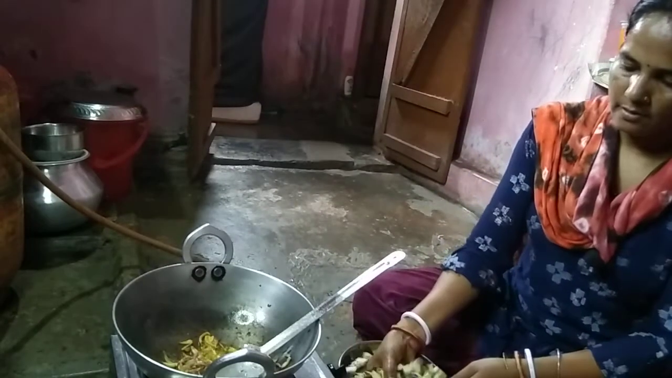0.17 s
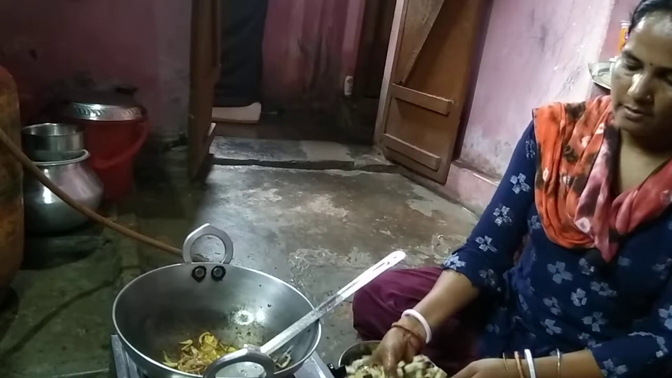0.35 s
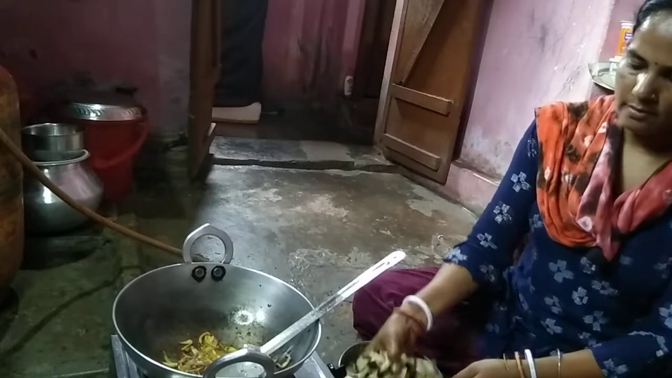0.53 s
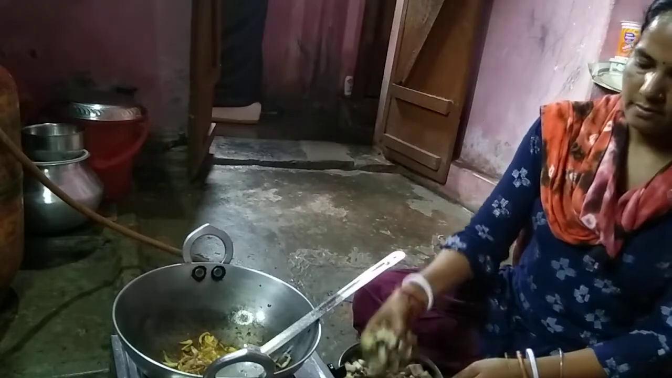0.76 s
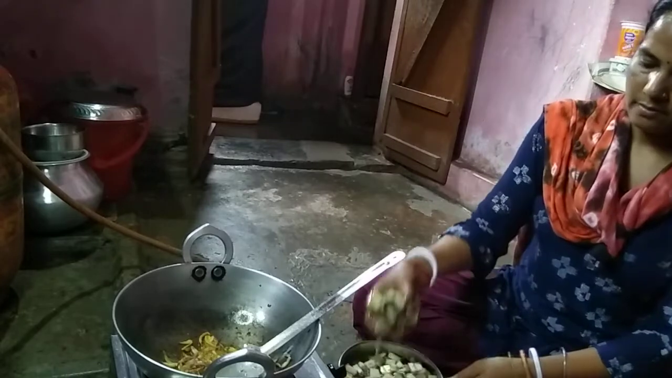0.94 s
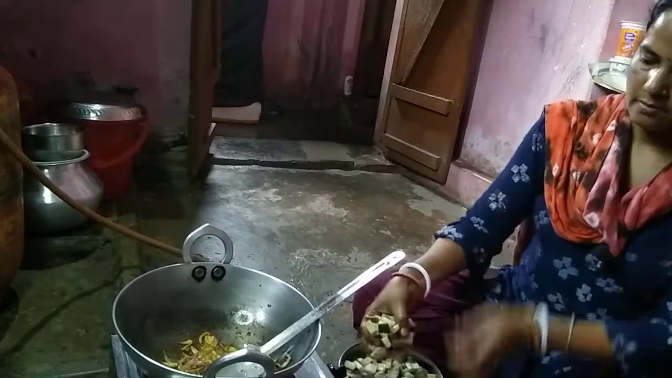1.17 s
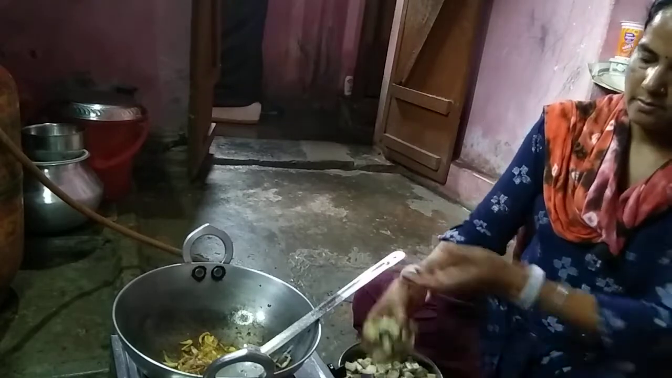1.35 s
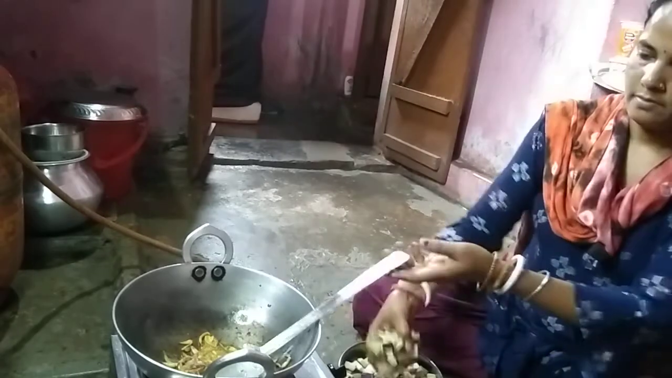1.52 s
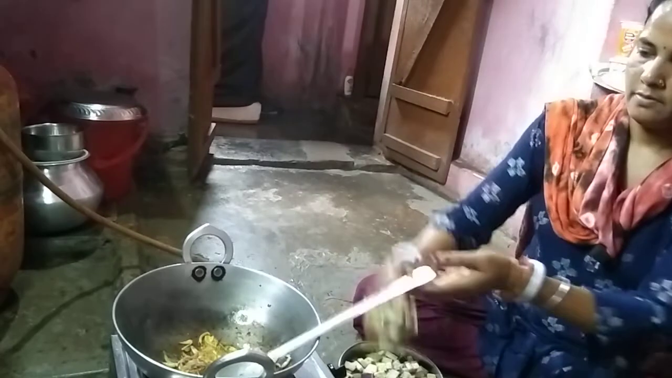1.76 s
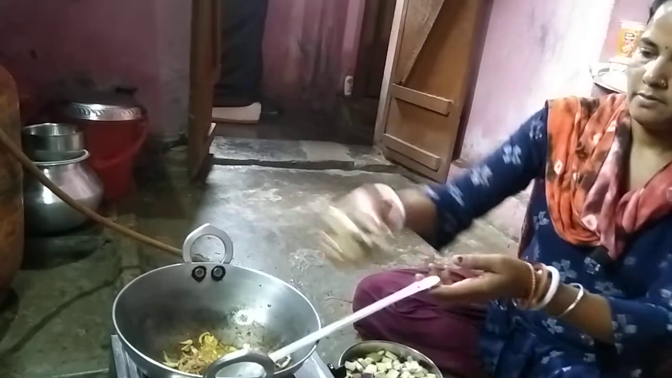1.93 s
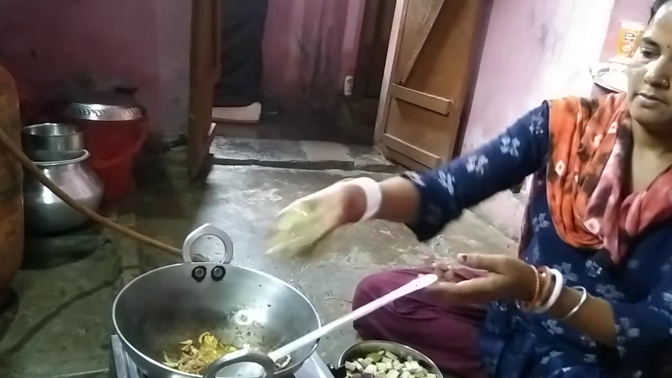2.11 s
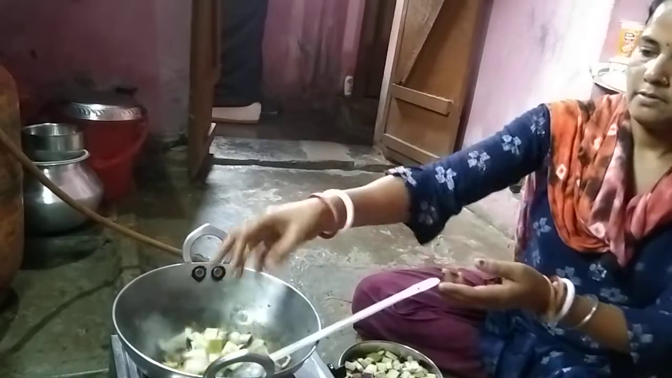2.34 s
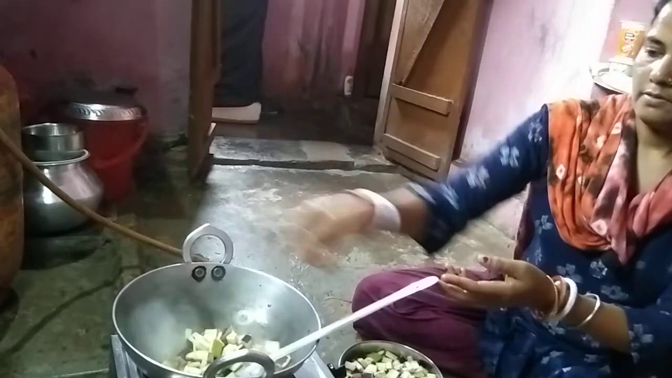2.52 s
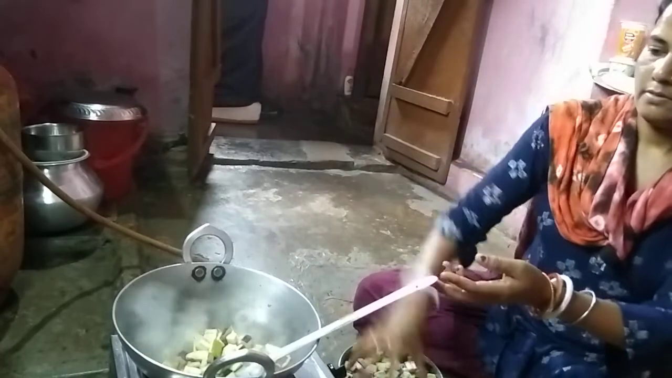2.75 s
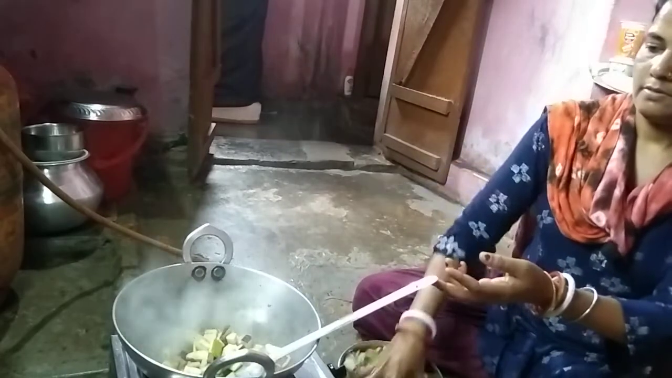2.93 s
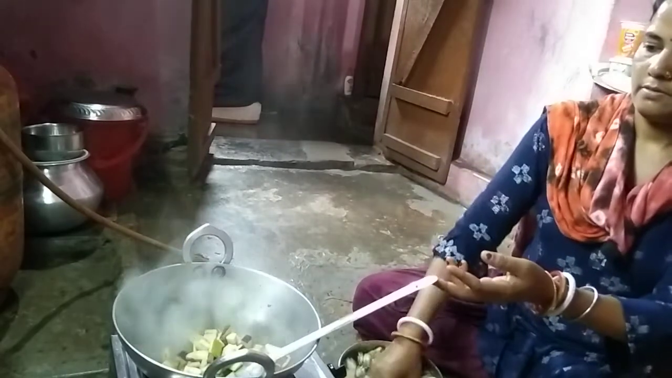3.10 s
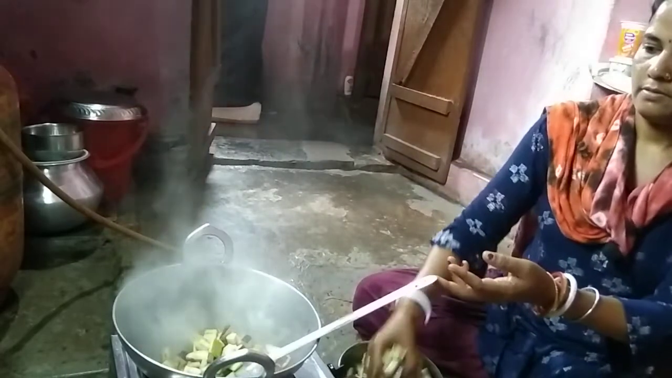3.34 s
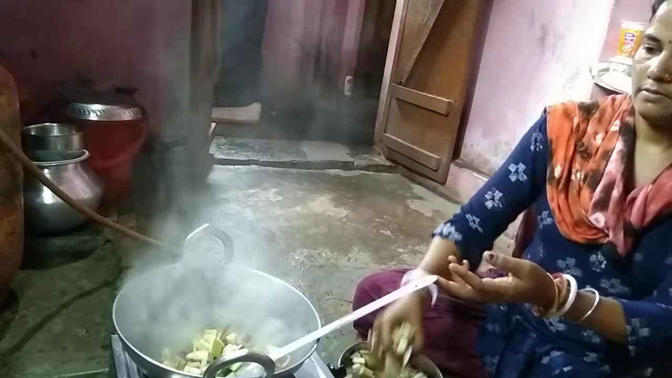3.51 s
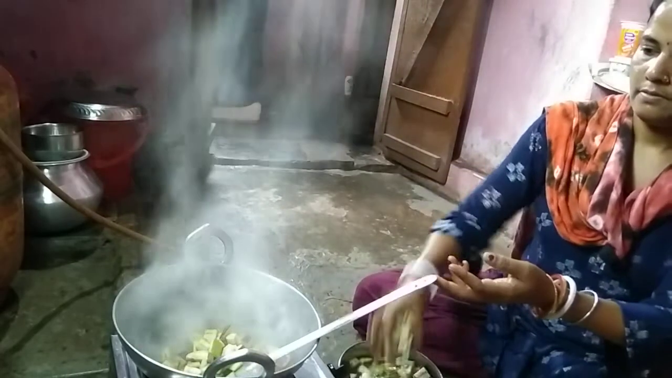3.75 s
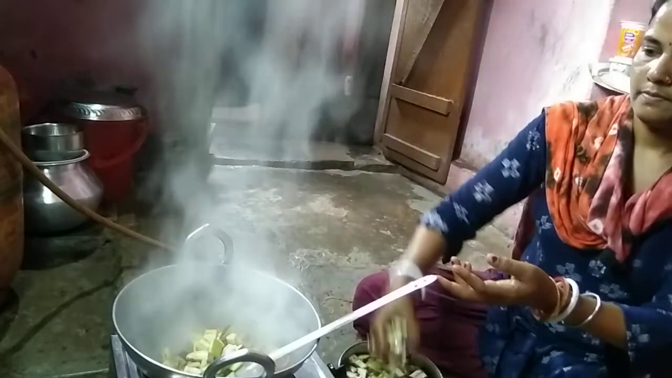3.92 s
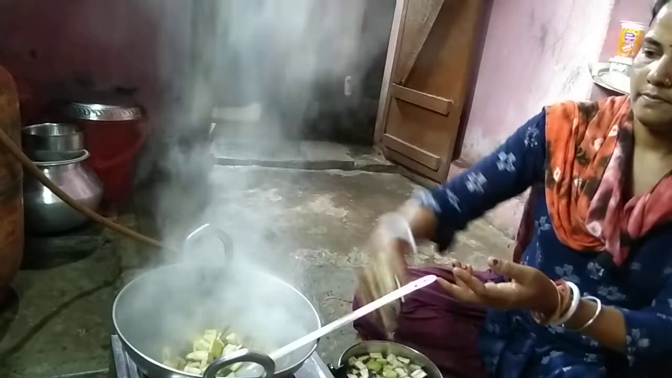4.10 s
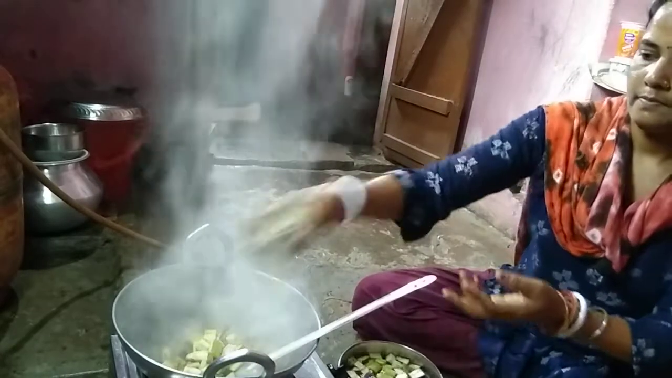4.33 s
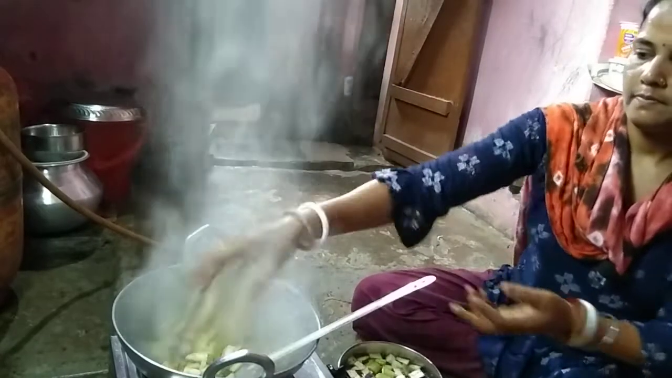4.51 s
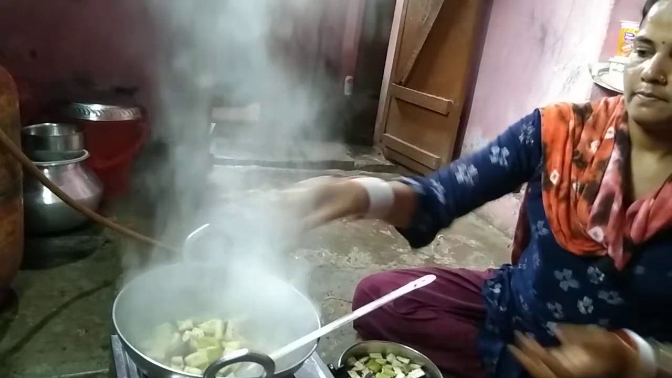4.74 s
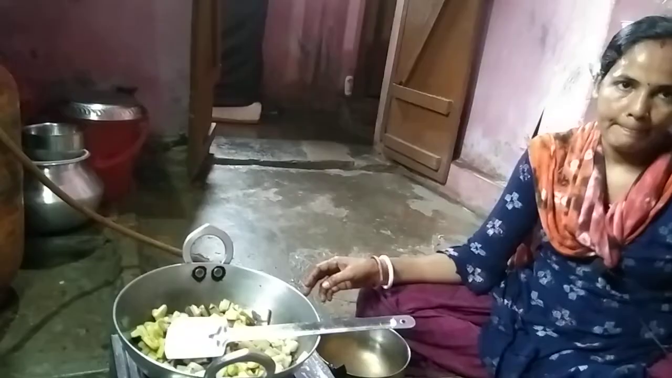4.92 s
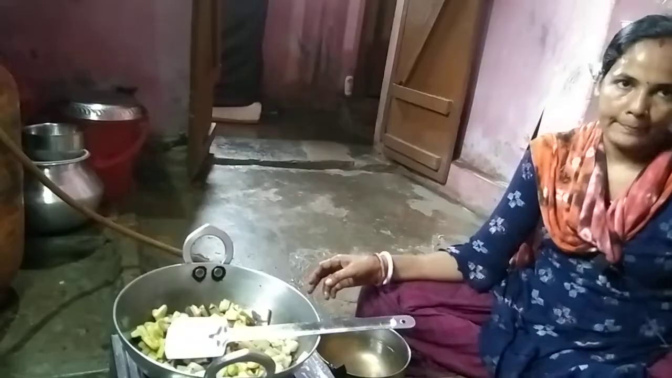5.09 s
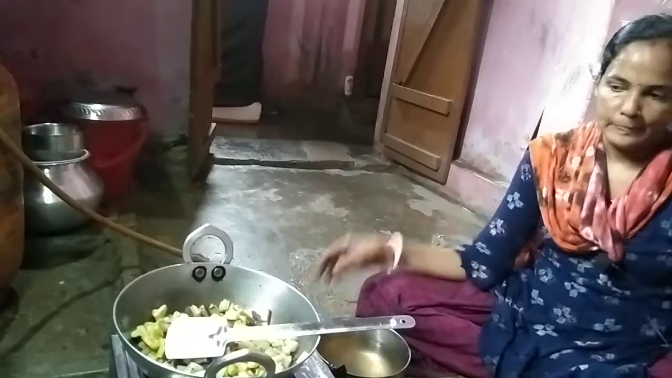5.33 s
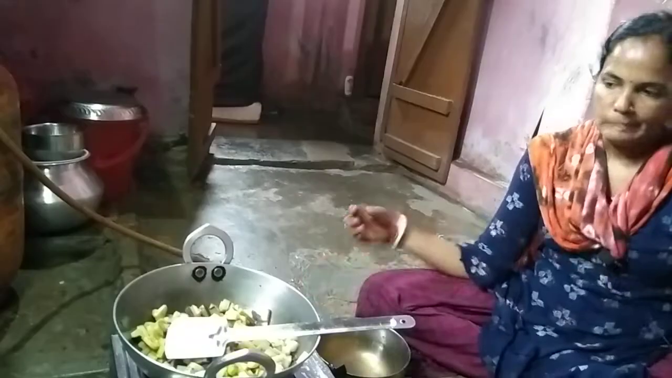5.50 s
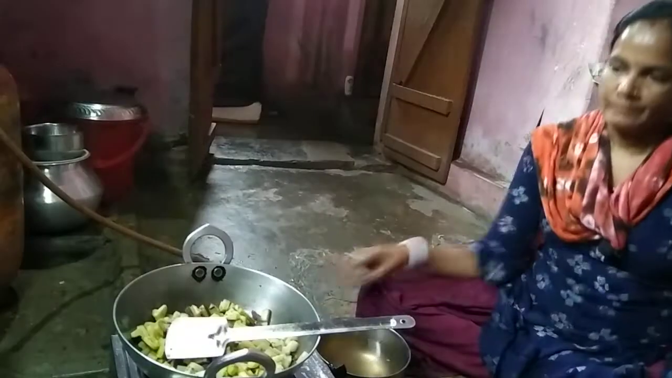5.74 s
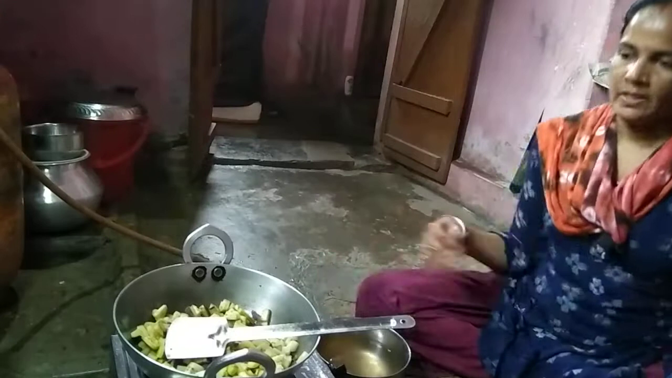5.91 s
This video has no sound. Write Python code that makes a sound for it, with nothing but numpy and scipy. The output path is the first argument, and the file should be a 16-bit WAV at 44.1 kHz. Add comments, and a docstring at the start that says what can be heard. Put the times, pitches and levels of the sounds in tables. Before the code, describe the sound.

In a small, hard-walled kitchen, spices fry faintly in a steel pan over a low burner rumble. A stray piece spits, then two handfuls of chopped vegetables flop into the oil with a loud, bright, bubbling sizzle. The sizzle stops dead, leaving soft frying. A bowl knocks on the floor and a steel spatula clicks and slides on the pan, all heard from one nearby microphone.

```python
"""Vegetables into hot oil

A small, hard-walled kitchen, one microphone near a steel pan, the burner rumbling underneath.
Spices fry faintly, a stray piece spits, then two handfuls of chopped vegetables flop into the oil
and their water bursts out as steam bubbles in a loud sizzle that stops dead. The pan then fries
softly, a bowl knocks down on the floor and rocks, and a steel spatula clicks and slides."""
import sys
import numpy as np
from scipy import signal
from scipy.fft import rfft, irfft
from scipy.io import wavfile

SR = 44100
rng = np.random.default_rng(int(sys.argv[2]) if len(sys.argv) > 2 else 0)


def unload_audio(sound):
    """Save the sound as a 16-bit wav file, at the path given as the first command line argument."""
    columns = np.transpose(np.atleast_2d(sound))
    # keep every value between -1 and 1, then stretch to whole-number steps
    steps = np.round(np.clip(columns, -1, 1) * 32767)
    wavfile.write(sys.argv[1], SR, steps.astype(np.int16))


N = 262874
T = np.arange(N) / SR

# The kitchen's echo. Each row: frequency in Hz, t60 (time to fall 60 dB) in seconds.
KITCHEN_DECAY = [(100, 0.61), (1000, 0.52), (6000, 0.31), (15000, 0.12)]
# Tone colours at the microphone. Each row: frequency in Hz, relative spectral level in dB.
RUMBLE_COLOUR = [(15, -47), (28, -36), (40, -21), (58, 7.5), (75, -4), (110, -10.5), (160, -9.5),
                 (250, -15), (500, -19.5), (800, -21.5), (1300, -27), (3000, -35), (8000, -41)]  # burner and room
FRYING_COLOUR = [(1000, -8), (3300, -10), (4800, -7), (6000, -1), (6750, 0.5), (8000, -5.5), (9500, -10),
                 (11600, -9.5), (13600, -17), (15500, -29)]  # thin frying in little oil
CRACK_COLOUR = [(300, -11), (1500, -3), (3500, -5), (6500, 3), (11000, -5), (15500, -24)]  # the dry start of a tick
KNOCK_COLOUR = [(15, -40), (40, -17), (100, 2), (180, 2), (260, -5.5), (340, 1), (480, -3.5), (650, -0.5),
                (900, -13.5), (1300, -8.5), (2000, -25.5), (3400, -20.5), (6500, -16), (10000, -31),
                (15000, -41)]  # a blow on the floor
BLADE_COLOUR = [(300, -19), (800, -15), (1150, -2), (1600, -28), (2100, -5), (2650, 4), (3100, -1.5),
                (4300, -3.5), (5500, 3.5), (6500, 4), (7600, -1.5), (9000, -17), (12000, -24), (15500, -31)]  # the spatula on steel
FLOP_COLOUR = [(100, -24), (230, -9), (320, -2.5), (430, -6), (560, -13), (750, -9), (1100, -8),
               (2000, -15), (5000, -43)]  # a soft piece landing
SPIT_COLOUR = [(300, -19), (1000, -19), (3000, -20.5), (4500, -14), (5700, -7), (6500, 0), (7800, -10.5),
               (10000, -24), (12000, -17), (15500, -45)]  # a wet face meeting the oil
STEAM_COLOUR = [(1000, -32.5), (2000, -19), (3000, -17), (3500, -17.5), (4300, -7), (5000, -5.5),
                (5800, -1.5), (6550, 1.6), (7800, -4.5), (9600, -8.5), (11500, -5.5), (12600, -11),
                (13800, -11.5), (15500, -22.5)]  # bursting steam bubbles
# Ringing modes. Each row: frequency in Hz, relative level in dB, t60 in seconds.
BOWL_MODES = [(118, -7.5, 0.18), (172, -15, .12), (222, -8, 0.094), (329, -3, 0.11), (385, -3, 0.079),
              (633, -2, 0.061), (940, -13, .07), (1300, -12, 0.072), (1600, -17, 0.077)]  # the full bowl and the floor
PAN_MODES = [(302, 0, 0.3), (327, -3.5, .16), (392, -10, 0.2), (514, -5, 0.35), (649, -3.5, 0.25),
             (945, -4.5, 0.21), (1010, -3, 0.19), (1276, -1.5, 0.11), (1455, -5, 0.14), (1696, -8, .12),
             (1960, -7, 0.19), (2240, -5, 0.13)]  # the steel pan with oil in it
# The pan's hollow around the heap. Each row: resonance in Hz, width in Hz, relative level in dB.
HOLLOW_RESONANCES = [(446, 12, -1.5), (489, 28, 1.5), (638, 160, -3.5), (894, 33, 2), (1003, 19, 4.5),
                     (1145, 150, 1.5), (1260, 82, 3), (1417, 145, 2), (1503, 19, -1.5), (1797, 70, 2.5),
                     (2110, 43, 5), (2434, 230, 1), (2910, 260, 1)]

# A hand gathering pieces in the bowl, the blade creeping over the pan.
# Each row: loudest moment in seconds, level in dB, length in seconds, centre in Hz, width in Hz.
RUSTLES = [(1.132, -63, 0.074, 6500, 3000), (1.34, -68.5, 0.27, 710, 120), (4.821, -56.5, 0.09, 400, 400),
           (5.505, -55, 0.15, 4960, 4000), (5.53, -60, 0.33, 636, 251), (5.898, -64, 0.21, 720, 120)]
# Clicks and plops of pieces, utensils and oil drops. Each row: start in seconds, level in dB, pitch in Hz.
TICKS = [(0.4573, -51, 4030), (0.9593, -43, 1360), (1.141, -41.5, 1655), (1.2475, -43, 7960),
         (1.285, -47.5, 1510), (1.545, -54, 645), (2.677, -28, 3750), (3.015, -33.5, 1350),
         (4.626, -23, 4900), (5.3285, -34, 10050), (5.53, -38.5, 1130), (5.6728, -30.5, 2150),
         (5.803, -41, 7640), (5.835, -37.5, 6350)]
# Bowl and hand on the floor.
# Each row: start in seconds, blow in dB, tilt in dB per octave, ring in dB, number of contacts.
KNOCKS = [(4.885, -30, 0, -33.5, 5), (5.1076, -45, 2.5, -54, 1), (5.3273, -39, 3, -59, 1)]
# The spatula on the pan. Each row: start in seconds, click in dB, slide in dB, slide t60 in seconds.
SPATULA_STROKES = [(5.513, -38, -45, 0.3), (5.5308, -26, -46, 0.46), (5.6732, -26.5, -51, 0.07),
                   (5.7147, -30.5, -43.5, 0.22), (5.729, -38, -56, 0.25)]
# Wet pieces flashing to steam. Each row: start in seconds, level in dB, t60 in seconds.
SPITS = [(1.782, -37.5, 0.091), (2.288, -35, 0.081), (2.674, -38, .09), (4.619, -38, 0.07)]
# The hiss flares as the heap settles. Each row: top in seconds, relative level in dB, length in seconds.
FLARES = [(2.536, -31, .12), (2.726, -34, .18), (4.413, -37, 0.56)]
# Handfuls reaching the oil. Each row: start in seconds, relative hiss in dB, relative boil in dB,
# seconds until the boil is fullest, flop in dB.
HANDFULS = [(2.276, -29, -47.5, 0.98, -48), (4.515, -33, -45.5, 0.4, -48.5)]

SIZZLE_STOP_S = 4.751
SPICES_DB, SIMMER_DB = -61.5, -55  # soft frying before and after the stop
STIR_TOP_S, STIR_LENGTH_S, STIR_LIFT_DB = 5.62, 0.79, 4.5  # frying swells as the spatula turns pieces
STRAY_S, STRAY_RING_DB, STRAY_FLOP_DB = 1.782, -53.5, -57  # one piece lands early
# From one contact of the rocking bowl to the next; the tilt is in dB per octave.
ROCK_GAP_S, ROCK_BLOW_DB, ROCK_RING_DB, ROCK_TILT_DB = .0195, -6, -8.5, -0.9


def amp(db):
    """Decibels to gain."""
    return 10 ** (np.asarray(db) / 20)


def unit(x):
    """Scales to rms 1."""
    return x / np.sqrt(np.mean(x ** 2) + 1e-20)


def read(points, hz):
    """Reads a table along a log-frequency axis."""
    f, value = np.transpose(points)
    return np.interp(np.log(hz + 1), np.log(f + 1), value)


def add(mix, s, sound):
    """Mixes a sound in at s seconds."""
    part = mix[round(s * SR):][:len(sound)]
    part += sound[:len(part)]


def decay(t, t60):
    """Exponential fade that loses 60 dB in t60."""
    return np.exp(-np.log(1000) * t / np.maximum(t60, 1e-4))


def swell(top_s, length_s):
    """A smooth rise and fall of height 1."""
    return np.cos(np.pi * np.clip((T - top_s) / length_s, -.5, .5)) ** 2


def drift(lo_hz, hi_hz):
    """Random wander of rms 1 between two rates."""
    hz = np.fft.rfftfreq(N, 1 / SR)
    band = (hz > lo_hz) * (hz < hi_hz) / np.sqrt(hz + 1)
    return unit(irfft(rfft(rng.standard_normal(N)) * band, N))


def colour(x, spectrum, size=4096):
    """Minimum-phase filter of unit energy with the given spectrum."""
    hz = abs(np.fft.fftfreq(size, 1 / SR))
    log_gain = np.log(amp(read(spectrum, hz)))
    taps = np.fft.ifft(np.exp(np.conj(signal.hilbert(log_gain)))).real
    return signal.oaconvolve(x, taps / np.linalg.norm(taps))[:len(x)]


def resonate(x, hz, width_hz):
    """Passes a sound through one resonance."""
    return signal.lfilter(*signal.iirpeak(hz, hz / width_hz, SR), x)


def bursts(per_s, spread_db):
    """Random clicks, most of them small and a few large."""
    size = amp(spread_db * np.minimum(rng.exponential(1, N), 5))
    return unit(size * rng.choice([-1, 1], N) * (rng.random(N) < per_s / SR))


def puff(spectrum, t60, t):
    """A short burst of coloured noise, from many small contacts at once."""
    fade = decay(t, t60)
    burst = colour(rng.standard_normal(len(t)) * fade, spectrum)
    return burst * np.linalg.norm(fade) / np.linalg.norm(burst)


def ring(modes, t):
    """A struck object's modes, each dying at its own speed."""
    return sum(amp(db) * decay(t, t60) * np.sin(2 * np.pi * (hz * t + rng.random()))
               for hz, db, t60 in modes)


def kitchen(x, wet_db):
    """The direct sound reaches the microphone, then echoes off hard walls, the treble dying first."""
    t = T[:SR // 2]
    echoes = rng.standard_normal(len(t)) * (rng.random(len(t)) < .1) * (t > .004)
    hz, age, bands = signal.stft(echoes, SR, nperseg=256)
    fade = decay(age, read(KITCHEN_DECAY, hz)[:, None])
    tail = signal.istft(bands * fade, SR, nperseg=256)[1]
    return x + amp(wet_db) * signal.oaconvolve(x, tail / np.linalg.norm(tail))[:N]


def burner_rumble(base_db=-62.3, lift_db=2.5):
    """The low bed of burner and room, swelling a little."""
    level_db = base_db + lift_db * swell(top_s=3.8, length_s=4) + 0.3 * drift(2.2, 17)
    return amp(level_db) * unit(colour(rng.standard_normal(N), RUMBLE_COLOUR, size=16384))


def fizz(spectrum, per_s, spread_db, wet_db, spots=8):
    """Bubbles burst at several spots of the pan, each with its own echoes from the room."""
    pops = sum(kitchen(bursts(per_s / spots, spread_db), wet_db) for _ in range(spots))
    return unit(colour(pops, spectrum))


def soft_frying(db):
    """Tiny bubbles in the hot oil make a thin, wavering hiss."""
    hiss = fizz(FRYING_COLOUR, per_s=7000, spread_db=1.5, wet_db=-6.5)
    return amp(db) * hiss * amp(.5 * drift(2.2, 40))


def rustles():
    """Light rubbing: a swell of tiny slips in one broad resonance."""
    out = np.zeros(N)
    for top_s, db, length_s, hz, width_hz in RUSTLES:
        slips = resonate(bursts(per_s=3300, spread_db=2.0), hz, width_hz)
        out += amp(db) * swell(top_s, length_s) * unit(slips)
    return out


def ticks(t60_at_1khz_s=0.021):
    """Each small contact cracks and rings for a moment; higher ones die sooner."""
    t, out = T[:SR // 10], np.zeros(N)
    for s, db, hz in TICKS:
        t60 = t60_at_1khz_s * (1000 / hz) ** 0.43
        ping = np.sin(2 * np.pi * hz * t) * decay(t, t60)
        crack = amp(-6) * puff(CRACK_COLOUR, 0.0051, t)
        add(out, s, amp(db) * (ping + crack))
    return kitchen(out, wet_db=-15)


def bowl_knocks(attack_s=0.0013):
    """Down on the floor, blows ring the damped bowl; it rocks to rest, each touch weaker and duller."""
    t, out = T[:SR // 2], np.zeros(N)
    attack = np.minimum(t / attack_s, 1)
    for s, blow_db, tilt_db, ring_db, contacts in KNOCKS:
        for k in range(round(contacts)):
            slope = tilt_db + k * ROCK_TILT_DB
            spectrum = [(hz, db + slope * np.log2(hz)) for hz, db in KNOCK_COLOUR]
            blow = amp(blow_db + k * ROCK_BLOW_DB) * puff(spectrum, 0.088, t)
            bowl = amp(ring_db + k * ROCK_RING_DB) * ring(BOWL_MODES, t)
            add(out, s + k * ROCK_GAP_S, (blow + bowl) * attack)
    return kitchen(out, wet_db=-18)


def spatula():
    """The blade clicks on the pan and then slides in tiny slips."""
    t, clicks, slides = T[:SR // 2], np.zeros(N), np.zeros(N)
    for s, click_db, slide_db, t60 in SPATULA_STROKES:
        add(clicks, s, amp(click_db) * puff(BLADE_COLOUR, 0.0067, t))
        slips = bursts(per_s=6600, spread_db=3.5)[:len(t)]
        add(slides, s, amp(slide_db) * slips * decay(t, t60))
    return kitchen(clicks + colour(slides, BLADE_COLOUR), wet_db=-9)


def landings(per_handful=3, delay_s=.012, gap_s=.016, ring_re_flop_db=-14.5):
    """Soft pieces flop in one after another and ring the pan; their wet faces spit in the oil."""
    t, thumps, spits = T[:SR // 2], np.zeros(N), np.zeros(N)
    pieces = [(STRAY_S, STRAY_RING_DB, STRAY_FLOP_DB)]
    for s, _, _, _, db in HANDFULS:
        pieces += [(s + delay_s + k * gap_s, db + ring_re_flop_db, db) for k in range(per_handful)]
    for s, ring_db, flop_db in pieces:
        add(thumps, s, amp(ring_db) * ring(PAN_MODES, t) + amp(flop_db) * puff(FLOP_COLOUR, 0.19, t))
    for s, db, t60 in SPITS:
        add(spits, s, amp(db) * puff(SPIT_COLOUR, t60, t))
    return kitchen(thumps, wet_db=-9) + kitchen(spits, wet_db=-7.5)


def bubbles(per_s, spread_db, lo_hz, hi_hz, cycles, sizes=24):
    """Bubbles of many sizes, each ringing briefly and rising a little in pitch."""
    t, out = T[:SR // 25], np.zeros(N)
    for hz in np.geomspace(lo_hz, hi_hz, sizes):
        age = hz * t / cycles
        rise = 1 + 0.0413 * np.minimum(age, 4)
        ping = np.sin(2 * np.pi * hz * t * rise) * np.exp(-age)
        out += signal.oaconvolve(bursts(per_s / sizes, spread_db), unit(ping))[:N]
    return unit(out)


def steaming(heat_up_s=0.16, drying_db_per_s=2.5):
    """Envelope of the hiss: each handful heats up quickly and dries slowly, with a few flares."""
    power = sum((amp(db) * swell(top_s, length_s)) ** 2 for top_s, db, length_s in FLARES)
    for s, hiss_db, _, _, _ in HANDFULS:
        age = np.maximum(T - s, 0)
        heating = 1 - np.exp(-age / heat_up_s)
        power += amp(hiss_db - drying_db_per_s * age) ** 2 * heating
    return np.sqrt(power)


def boiling(steam, sharpness=3.05):
    """Envelope of the big bubbles: a little comes with the hiss, most as juice gathers and boils away."""
    power = (amp(-25) * steam) ** 2
    for s, _, boil_db, fullest_s, _ in HANDFULS:
        age = np.maximum(T - s, 0) / fullest_s
        power += amp(boil_db) ** 2 * (age * np.exp(1 - age)) ** sharpness
    return np.sqrt(power)


def sizzle(hiss_trim_db=-.5, boil_trim_db=2.27):
    """Water boils off the pieces: fine bursts, ringing droplets, big bubbles in the pan's hollow."""
    steam = steaming()
    spray = fizz(STEAM_COLOUR, per_s=12000, spread_db=3.0, wet_db=0.5)
    droplets = bubbles(per_s=2500, spread_db=2.0, lo_hz=5170, hi_hz=7790, cycles=8.7)
    droplets *= steam / steam.max()  # the fiercer the steam, the larger their share
    flicker = amp(.5 * drift(8.8, 90))
    hiss = unit(spray + amp(-4.5) * droplets) * flicker
    pops = bursts(per_s=1100, spread_db=3.0)
    hollow = sum(amp(db) * resonate(pops, hz, width_hz) for hz, width_hz, db in HOLLOW_RESONANCES)
    blips = bubbles(per_s=200, spread_db=0.0, lo_hz=907, hi_hz=2893, cycles=10.2)
    boil = unit(kitchen(unit(hollow) + amp(-11.5) * blips, wet_db=-9.0))
    return amp(hiss_trim_db) * hiss * steam + amp(boil_trim_db) * boil * boiling(steam)


def scene():
    """One microphone feeds both channels; the loud sizzle gives way to soft frying within 2 ms."""
    before_stop = np.clip((SIZZLE_STOP_S - T) / .002, 0, 1)
    loud = soft_frying(SPICES_DB) + sizzle() + landings()
    soft = soft_frying(SIMMER_DB + STIR_LIFT_DB * swell(STIR_TOP_S, STIR_LENGTH_S))
    pan = before_stop * loud + (1 - before_stop) * soft
    mono = pan + ticks() + rustles() + bowl_knocks() + spatula() + burner_rumble()
    return np.array([mono, mono])


def record(dry):
    """The recorder behind the microphone cuts off the highest treble."""
    edge_hz = 15560
    lowpass = signal.firwin(801, edge_hz, window=("kaiser", 9), fs=SR)
    return signal.oaconvolve(dry, lowpass[None], "same")


dry = scene()
out = record(dry)
unload_audio(out)
```